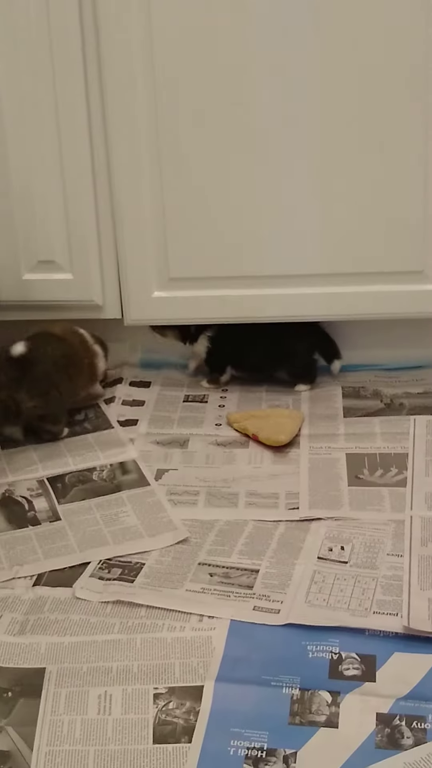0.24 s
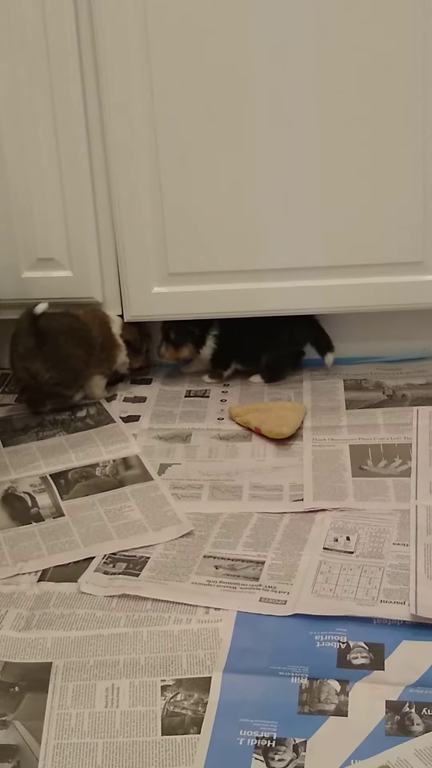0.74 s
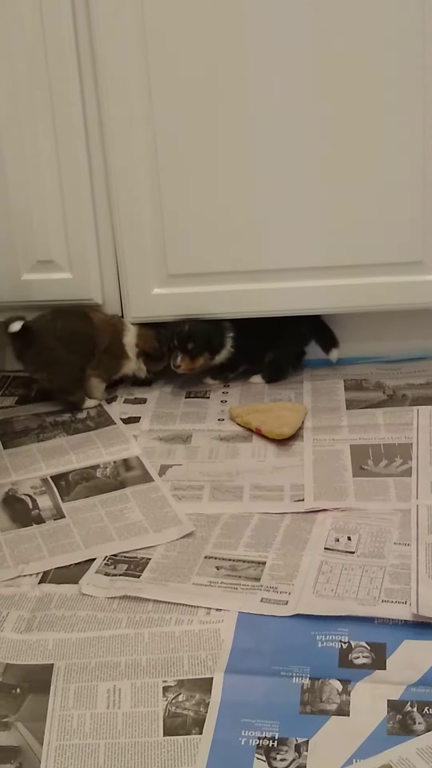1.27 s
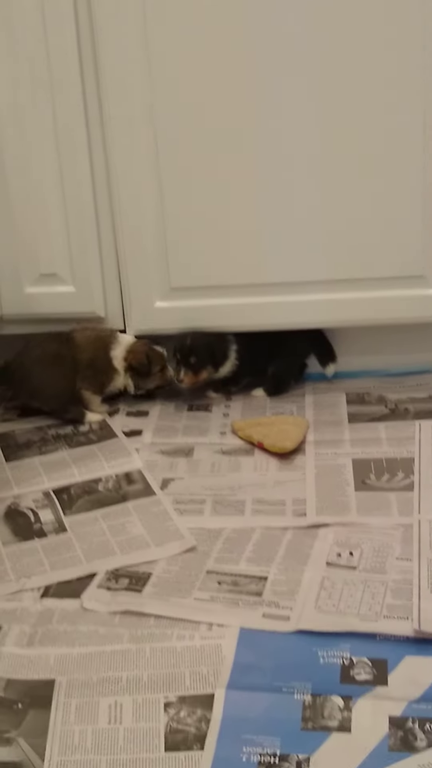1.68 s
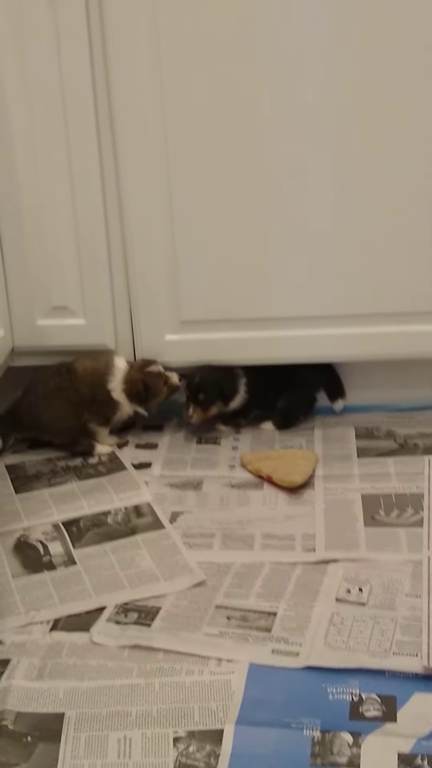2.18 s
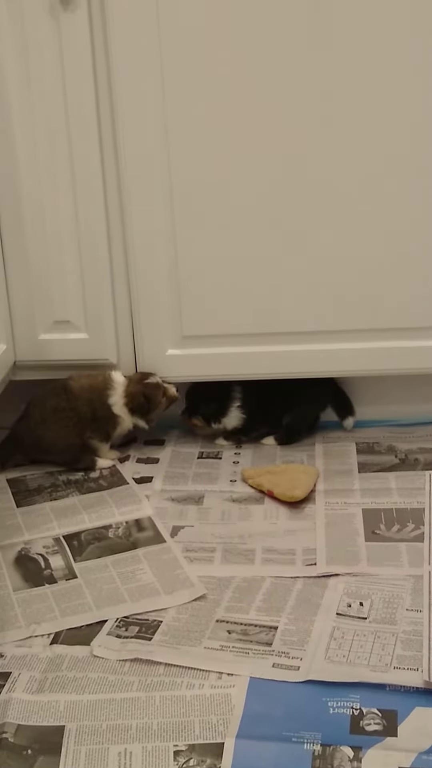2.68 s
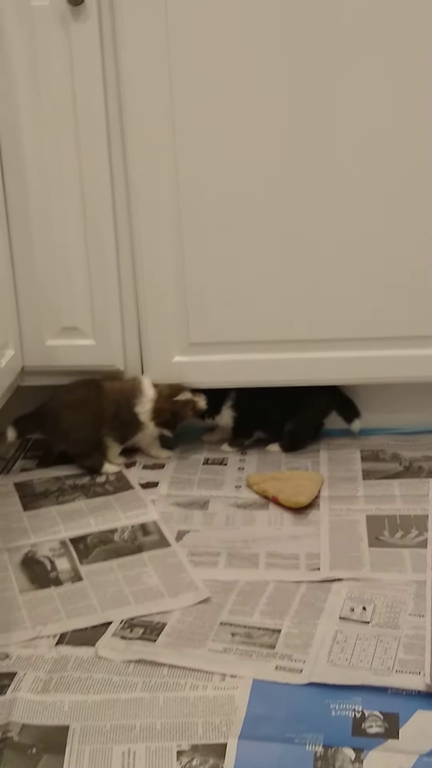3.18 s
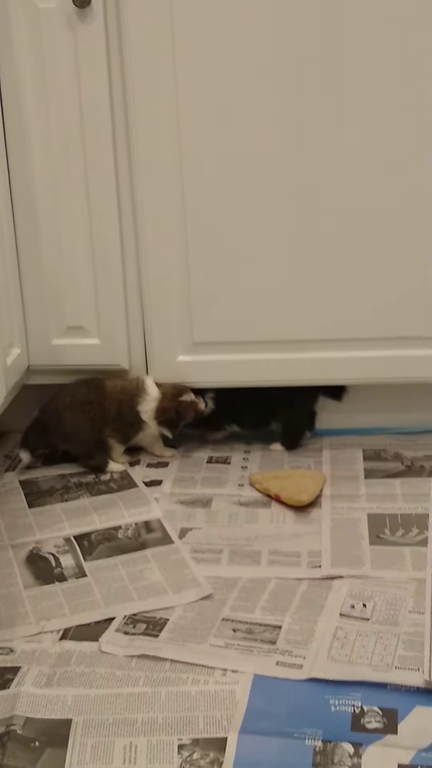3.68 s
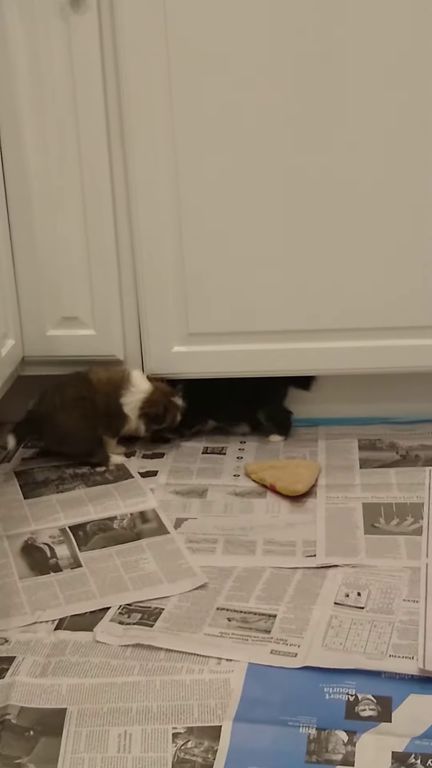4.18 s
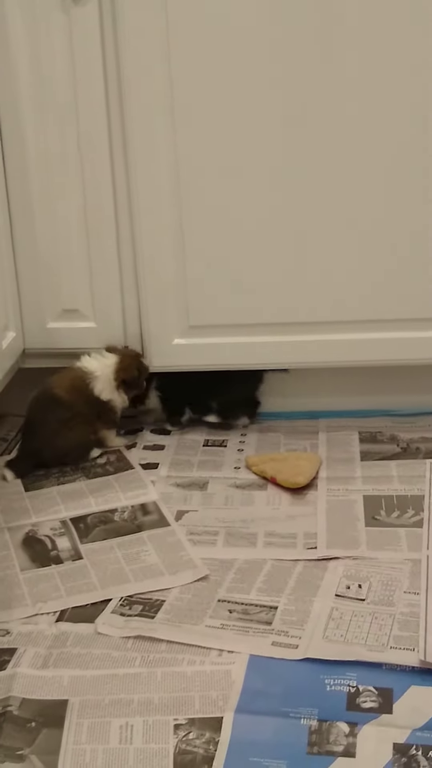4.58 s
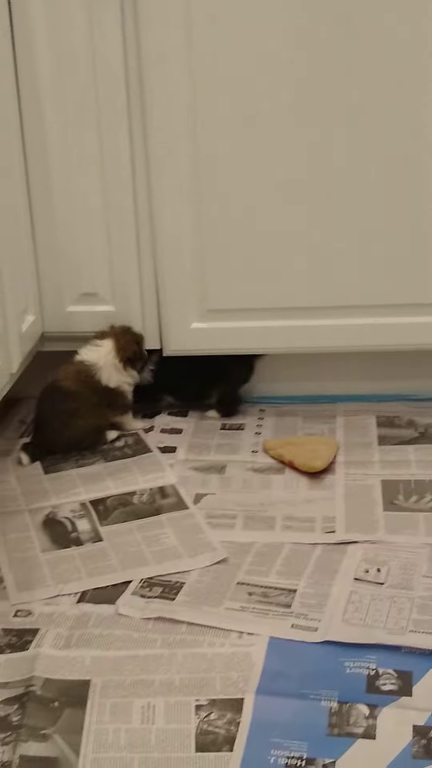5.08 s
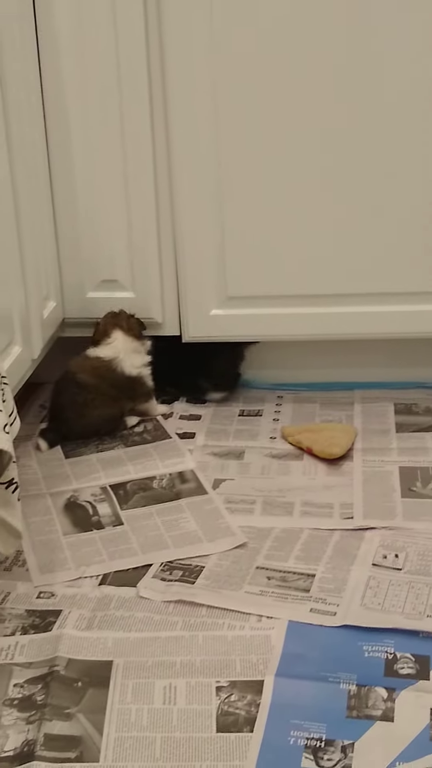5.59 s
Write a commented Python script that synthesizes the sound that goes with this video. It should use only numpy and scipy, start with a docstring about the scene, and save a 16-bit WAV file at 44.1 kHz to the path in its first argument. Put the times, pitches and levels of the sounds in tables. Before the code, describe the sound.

In a quiet kitchen with a faint steady room tone, puppies shuffle on newspaper laid over a hard floor. At about 0.1 s a soft double thud with a hollow cupboard rumble comes with a short crinkle and crease. It then falls almost silent, with only tiny ticks and a faint bump near 0.8 s. From 1.2 s small rustles begin, and between 1.8 and 3 s crisp snaps of buckling paper come often over light sliding hiss. From 3.1 s the movement is stronger: the heaviest thud lands near 3.5 s, with loud crinkles around 3.25, 3.75 and 4.05 s. Sliding swells near 4.3 s, a soft thump falls at 4.5 s, and further shoves follow at 4.8 and 5.2 s. Sharp creases pop near 5.35 and 5.5 s, with a last soft bump at 5.7 s and a crinkle just after. Light paw padding runs underneath; the reverberation is short and the stereo wide.

```python
"""Sheets of newspaper crinkle, slide and snap as small puppies shuffle on them on a hard kitchen floor.
Crinkle, hiss and padding are swarms of coloured noise grains; buckling creases are resonant bursts.
Soft thuds join damped low modes to filtered noise, the rumble and scrape of a cupboard.
Diffuse reverberation answers the paper over a faint room tone; two spaced microphones receive it all."""
import sys
import numpy as np
from scipy import signal
from scipy.fft import rfft, irfft, next_fast_len
from scipy.io import wavfile
from scipy.ndimage import uniform_filter1d

SR = 44100
rng = np.random.default_rng(int(sys.argv[2]) if len(sys.argv) > 2 else 0)


def volts_from_decibels(level):
    """Turn decibel levels (scalar or array-like) into linear amplitude factors."""
    exponent = np.asarray(level, float) / 20
    return 10 ** exponent


def dump(signal):
    """Clip the signal to [-1, 1] and save it as 16-bit WAV at the path in sys.argv[1]."""
    limited = np.clip(np.atleast_2d(signal).T, -1, 1)
    pcm = np.round(limited * 32767).astype(np.int16)
    wavfile.write(sys.argv[1], SR, pcm)


N = 257984  # samples

# Room tone spectrum: (frequency [Hz], relative density [dB per Hz])
TONE_SPECTRUM = [(15, -61), (25, -34), (64, -45), (76, -7.5), (161, -18), (217, -3), (317, -15.5),
                 (489, -19), (531, -20), (1560, -34), (8360, -27.5), (9070, -28), (11900, -27),
                 (12900, -20), (13600, -25), (16000, -25)]
# Reverberation of the kitchen: (frequency [Hz], decay time by 60 dB [s])
KITCHEN_DECAY = [(60, 0.43), (250, 0.19), (1000, 0.23), (4000, 0.23), (12000, 0.18)]

# Soft landings: (time [s], nominal level [dB], low modes [dB], door [dB], rise time of the noise [s])
LANDINGS = [(.087, -40.5, -12, 5.5, .0059), (.101, -34, -8, 4.5, .026), (.747, -58, -20, 10.5, .004),
            (.837, -41.5, -26, 6, .031), (1.152, -53, -17, -10, .011), (1.395, -52, -20, 3, .006),
            (2.077, -56.5, -4.5, -1, .016), (2.74, -57, -12, 2, .03), (3.124, -41.5, -36, 9.5, .0099),
            (3.18, -49, -25, 8, .015), (3.227, -55, -3, -8, .0082), (3.308, -53.5, -4, -1, .014),
            (3.358, -57, -6, 12, .0066), (3.476, -27, -7.5, .5, .013), (4.029, -57, -9, 12, .011),
            (4.17, -54, -20, 3, .03), (4.53, -35, -7, 6, .024), (4.63, -48, -11, 3, .015),
            (4.726, -55, -4, -8, .027), (4.892, -48, -1.5, -6.5, .021), (5.09, -49, -17, -20, .0054),
            (5.72, -34.5, -20, -9, .016)]
# Low modes of floor and room: (frequency [Hz], relative level [dB], decay by 60 dB [s], build-up [s])
FLOOR_MODES = [(53.7, -8, 0.45, 0.058), (93.1, -3, 0.38, 0.011), (120, 1.5, 0.18, 0.0042)]
# Cupboard door modes: (frequency [Hz], width [Hz], relative level [dB])
DOOR_MODES = [(323, 26, -1.5), (398.5, 28, 1.5), (464, 60, -3), (552, 80, -3.5), (647, 35, -0.5),
              (765, 56, -3), (915, 150, -6.5), (1140, 250, -9.5)]
# Cupboard carcass spectrum: (frequency [Hz], relative density [dB per Hz])
CARCASS_SPECTRUM = [(90, -26), (150, -1), (190, 3), (260, 4), (340, -10), (550, -27.5)]
# Scrape of fur and claws: (frequency [Hz], relative density [dB per Hz])
SCRAPE_SPECTRUM = [(500, 8), (1000, 1.5), (2500, -1.5), (6000, -18.5), (11000, -10.5), (16000, -57)]

# Buckling creases: (time [s], nominal level [dB], centre [Hz], relative treble [dB], left-right [dB])
CREASES = [(.0913, -31, 2330, -21, 17), (.289, -48, 4160, -20, 8), (.463, -52, 6900, -19, -5),
           (1.1952, -52, 3760, -18, -4), (1.268, -44, 1860, -4, 2), (1.418, -42, 2750, -5, -4),
           (1.452, -39, 2820, -23, -.5), (1.512, -39, 5400, -17, 6), (1.5359, -46, 2060, 0, -1.5),
           (1.665, -46, 3600, 2, -3.5), (1.707, -43, 4080, -25, -3), (1.8013, -43.5, 2760, -13, 5),
           (1.8137, -36, 5600, -22, -7), (1.875, -40.5, 3900, -3, -5), (1.9804, -31, 6840, -28, -6),
           (2.035, -28.5, 5900, -5, -1.5), (2.0557, -33.5, 3840, -14, 2), (2.0914, -36, 4840, -19, 3),
           (2.168, -28, 4070, -8, -3), (2.377, -39.5, 5200, -19, 0), (2.3965, -43, 5350, -16, 13),
           (2.572, -39, 2160, -15, 2), (2.603, -38.5, 3840, 2, -10), (2.6457, -25.5, 3400, -4, -1.5),
           (2.715, -37, 5060, -4, -2), (2.7263, -28.5, 3850, 3.5, -3.5), (2.77, -40, 4000, -6, -2),
           (2.8043, -35, 3620, 4, -5), (2.822, -36.5, 4770, -12, 8), (2.8614, -37, 1950, -31, 0),
           (2.9264, -42, 3420, 4, -3), (3.028, -44, 4400, 1, -3.5), (3.1203, -36, 2420, -1.5, 2),
           (3.229, -36, 3040, 8, 9), (3.252, -28, 3930, -5, -2.5), (3.3637, -28, 2680, -24, 1),
           (3.4055, -38, 2650, -1, -12), (3.4745, -27, 2430, 2.5, 7), (3.6545, -26, 4100, -3, -5),
           (3.7474, -26.5, 4300, -6, -5.5), (3.8368, -35.5, 4530, -22, -8), (3.903, -35, 4400, -24, -5),
           (3.9789, -35, 3970, -34, -5), (4.022, -40, 3700, -14, -1), (4.0496, -26.5, 3990, 1.5, -14),
           (4.0911, -29.5, 2330, 12, -1), (4.2457, -28, 2500, -5, -5.5), (4.4775, -43, 2350, 5, -4.5),
           (4.53, -42, 2000, -9, 9), (4.7223, -37, 3340, -1, -7), (5.1804, -35, 3100, -18, -1),
           (5.2235, -32, 3100, -20, -6), (5.2865, -35.5, 2800, -22, -4.5), (5.2998, -31.5, 2380, -24, -10),
           (5.3588, -25, 3030, -32, -1), (5.368, -30.5, 3100, -30, 2), (5.5258, -23, 2360, -1.5, -1),
           (5.582, -30.5, 4830, -4.5, -10), (5.685, -46, 4300, -23, -10), (5.7512, -30.5, 2700, -28, 8.5),
           (5.831, -40, 2400, -5, -5)]
# Shoves of a paw on the sheets: (peak time [s], relative crinkle level [dB], relative slide hiss [dB],
# time to swell by 20 dB [s], time to fade by 20 dB [s])
PAW_SHOVES = [(.005, -70, -68, .05, .5), (.105, -40.5, -36, .015, .1), (.23, -64, -58, .1, .06),
              (.37, -80, -63, .012, .12), (.47, -72, -66, .04, .03), (.76, -80, -84, .02, .08),
              (.817, -72, -57, .012, .1), (.87, -53, -64, .06, .08), (1.15, -73, -66, .15, .15),
              (1.32, -55, -50, .12, .07), (1.45, -53, -60, .08, .2), (1.55, -60, -57, .05, .04),
              (1.7, -59, -62, .2, .25), (1.82, -61, -55, .03, .4), (1.99, -50, -46, .06, .2),
              (2.12, -52, -52, .2, .12), (2.265, -60, -57, .2, .02), (2.41, -56, -66, .02, .055),
              (2.56, -58, -54, .012, .3), (2.7, -56, -52, .2, .2), (2.82, -53, -50, .2, .13),
              (3.06, -61, -52, .15, .045), (3.13, -52, -52, .03, .3), (3.25, -43.5, -52, .07, .1),
              (3.36, -48, -44, .02, .2), (3.49, -45, -45, .06, .22), (3.6, -48, -46, .06, .06),
              (3.655, -54, -43, .015, .05), (3.745, -39, -42, .035, .11), (3.91, -58, -57, .02, .2),
              (3.99, -50, -54, .02, .3), (4.06, -42.5, -39, .03, .23), (4.25, -42, -45, .02, .1),
              (4.318, -43, -36.5, .1, .085), (4.49, -64, -60, .15, .012), (4.59, -45, -47, .08, .09),
              (4.68, -50, -47, .012, .15), (4.77, -40.5, -41, .07, .055), (4.93, -50.5, -50, .3, .065),
              (5.095, -53, -50, .1, .1), (5.155, -55, -40, .15, .1), (5.234, -38.5, -53, .1, .12),
              (5.36, -44.5, -44, .012, .3), (5.43, -42.5, -44, .15, .055), (5.53, -47, -43, .012, .1),
              (5.69, -58, -51, .015, .07), (5.784, -45.5, -65, .03, .05)]
# Light padding of paws: (time [s], relative level [dB])
PADDING_LEVEL = [(0, -64), (.49, -73), (1.0, -72), (1.3, -68), (2.13, -69), (2.45, -74), (2.72, -65),
                 (3.05, -72), (3.34, -58), (3.84, -64), (4.24, -60), (4.4, -69), (4.56, -69), (4.76, -61),
                 (5.0, -68), (5.2, -63), (5.31, -61), (5.85, -64)]
# Spectra of padding, sliding and crinkling: (frequency [Hz], relative density [dB per Hz])
PADDING_SPECTRUM = [(60, -11), (100, 0), (240, -0.5), (500, -2), (1000, -4.5), (2000, -16.5)]
SLIDE_SPECTRUM = [(1760, -36), (3000, -17.5), (3290, -9), (3480, -19), (4260, -15), (4700, -6.5),
                  (9870, -4), (16000, -2)]
CRINKLE_SPECTRUM = [(410, -48), (700, 3.5), (852, -5.5), (1050, 4), (1420, 2), (3740, 6.5), (7200, -4.5),
                    (10900, 6), (16000, -20)]

# Response shared by both microphones: (frequency [Hz], gain [dB])
MIC_RESPONSE = [(32, -21), (50, 1.5), (11000, -0.5), (13000, -3), (16000, -9.5)]
# Mismatch of the microphones: (frequency [Hz], left-right [dB])
MIC_MISMATCH = [(60, 1.8), (250, 1.5), (1000, 1), (3000, -0.4), (6000, 0.3), (8500, 0.5), (10500, -8.5),
                (12500, -5), (16000, 0.5)]

TONE_DB = -67.5  # rms at the microphones, ahead of their response
SPACING_M, SOUND_SPEED = 0.18, 343  # between the microphones; m/s
PAPER_LAG_S = 0.000411  # the paper reaches the left microphone this much after the right
TOP_HZ = 15900  # band limit
THUD_T60_S, SCRAPE_DB = .37, -5  # the scrape goes with the door
DEEP_PER_DB = .3  # harder landings reach deeper: dB gained per dB of thud and per octave down
SNAP_S = .0042  # time scale of the chatter
SNAP_ROOM_DB, ROOM_DB_PER_OCTAVE = -2.5, -3.5  # share sent to the room at 3 kHz; small creases beam more
NARROWS_PER_DB = .035  # creases with under -12 dB of treble ring more narrowly: width share per dB
SHOVE_ROUND = 1.2  # 1 = pointed peak, more = a held push that stops abruptly
PRESS_DB = -19  # a shove presses on the floor too
SIDES = np.array([[1], [-1]])  # left, right


def unit(x):
    """Normalisation to a root mean square of one."""
    return x / np.sqrt(np.mean(x ** 2) + 1e-20)


def along(points, hz):
    """Linear interpolation of (Hz, value) points on a logarithmic frequency axis."""
    f, v = np.transpose(points)
    return np.interp(np.log(hz + 1), np.log(f + 1), v)


def curves(rows):
    """Linear interpolation in time: one value per sample for each column after the time."""
    s, *cols = np.transpose(rows)
    return [np.interp(np.arange(N) / SR, s, c) for c in cols]


def filtered(x, response):
    """Linear filtering: the spectrum of x times a complex response of frequency."""
    m = next_fast_len(x.shape[-1] + 8192)
    spectrum = rfft(x, m) * response(np.fft.rfftfreq(m, 1 / SR))
    return irfft(spectrum, m)[..., :x.shape[-1]]


def coloured(x, spectrum):
    """Spectral shaping to a given density, at unit rms."""
    return unit(filtered(x, lambda hz: volts_from_decibels(along(spectrum, hz))))


def resonant(x, modes):
    """Modal superposition: damped resonances (Hz, width, dB) summed with alternating sign."""
    def response(f):
        total = 0
        for k, (centre, width, db) in enumerate(modes):
            damping = 1j * f * width
            total = total + (-1) ** k * volts_from_decibels(db) * damping / (centre * centre - f * f + damping)
        return total
    return filtered(x, response)


def diffuse(pair):
    """Diffuse-field coherence: alike in the bass, unrelated once the wave is shorter than the spacing."""
    def mid_side_gains(hz):
        turn = np.arccos(np.sinc(2 * hz * SPACING_M / SOUND_SPEED)) / 2
        return np.array([np.cos(turn), np.sin(turn)])
    mid, side = filtered(pair, mid_side_gains)
    return np.array([mid + side, mid - side])


def grains(per_s, spread_db, life):
    """Shot noise: tiny decaying bursts of uneven size at chance moments, evened over 0.1 s."""
    kicks = (rng.random(N) < per_s / SR) * volts_from_decibels(spread_db * rng.standard_normal(N))
    decay = np.exp(-np.arange(SR // 20) / (life * SR))
    swarm = signal.fftconvolve(kicks, decay)[:N] * rng.standard_normal(N)
    return swarm / np.sqrt(abs(uniform_filter1d(swarm ** 2, size=SR // 10)) + 1e-6)


def room_tone():
    """Stationary diffuse noise: random sound from all sides with a fixed spectrum."""
    return volts_from_decibels(TONE_DB) * coloured(diffuse(rng.standard_normal((2, N))), TONE_SPECTRUM)


def kitchen(x):
    """Reverberation as decaying noise; the sources move, so the tail changes from moment to moment."""
    hop, out = 2048, np.zeros((2, N + 2 * SR))
    x = np.pad(x, (hop, 2 * hop))
    for start in range(0, N + hop, hop):
        hz, t, z = signal.stft(rng.standard_normal((2, SR // 2)), SR, nperseg=256)
        decay = volts_from_decibels(-60 * t / along(KITCHEN_DECAY, hz)[:, None])
        tail = signal.istft(z * decay, SR, nperseg=256)[1]
        tail = unit(tail) / np.sqrt(tail.shape[1])
        piece = x[start:start + 2 * hop] * signal.windows.hann(2 * hop, sym=False)
        wet = signal.fftconvolve(piece[None], tail, axes=1)
        out[:, start:start + wet.shape[1]] += wet
    first_wall = round(.003 * SR)  # the tail starts 3 ms late
    return diffuse(out[:, hop - first_wall:][:, :N])


def low_modes(t, db, low_db):
    """Damped modal vibration: the floor and room modes that one landing sets ringing."""
    boom = np.zeros(len(t))
    for hz, mode_db, t60, build in FLOOR_MODES:
        deep_db = DEEP_PER_DB * (db + 40) * np.log2(FLOOR_MODES[-1][0] / hz)
        drift = 4 * np.cumsum(rng.standard_normal(len(t))) / np.sqrt(SR)  # the weight keeps shifting
        cycle = np.sin(2 * np.pi * hz * t + drift)
        decay = volts_from_decibels(db + low_db + mode_db + deep_db + 5 - 60 * t / t60)
        boom += decay * (1 - np.exp(-t / build)) * cycle
    return boom


def evened(x):
    """Levelling of power over 40 ms, as from a firm contact."""
    power = uniform_filter1d(np.mean(x ** 2, axis=0), size=SR // 25)
    return x / np.sqrt(abs(power) + 1e-9)


def thuds():
    """Impact of a soft body: low modes ring, diffuse cupboard rumble and scrape build up and die away."""
    t = np.arange(SR // 2) / SR
    boom, swells = np.zeros(N + SR), np.zeros((3, N + SR))
    for s, db, low_db, door_db, rise in LANDINGS:
        at = slice(round(s * SR), round(s * SR) + len(t))
        # carcass, door, scrape: the higher, the sooner gone
        shares = volts_from_decibels([-4 + 0 * t, door_db - 5.5 - 12 * t, door_db + SCRAPE_DB - 25 * t])
        swells[:, at] += shares * (1 - np.exp(-t / rise)) * volts_from_decibels(db - 60 * t / THUD_T60_S)
        boom[at] += low_modes(t, db, low_db)
    a, b, c = (diffuse(rng.standard_normal((2, N))) for _ in range(3))
    carcass = evened(coloured(a, CARCASS_SPECTRUM))
    door = evened(resonant(b, DOOR_MODES))
    scrape = coloured(c, SCRAPE_SPECTRUM)
    noises = carcass, door, scrape
    return boom[:N] + sum(swell[:N] * noise for swell, noise in zip(swells, noises))


def snaps():
    """Buckling excites a resonance set by crease size: chatter at both microphones, clicks for the room."""
    near, clicks, t = np.zeros((2, N + SR)), np.zeros(N + SR), np.arange(2048) / SR
    u = t / SNAP_S
    envelope = u ** 0.89 * np.exp(-2.2 * u ** 2.9)
    for s, db, hz, treble_db, pan_db in CREASES:
        room_db = SNAP_ROOM_DB + ROOM_DB_PER_OCTAVE * np.log2(hz / 3000)
        width = np.clip(0.92 + NARROWS_PER_DB * (treble_db + 12), .4, .92) * hz
        modes = [(hz, width, 0), (10500, 4500, treble_db)]
        shared, *own = rng.standard_normal((3, len(t))) * envelope
        burst = resonant(shared + 1.57 * np.array(own), modes)
        burst = burst / np.linalg.norm(burst, axis=1, keepdims=True)
        click = resonant(1. * (t == 0), modes)
        click = click / np.linalg.norm(click)
        size = volts_from_decibels(db - 9) * np.sqrt(SNAP_S * SR)  # from level and length to the norm of the burst
        at = slice(round(s * SR), round(s * SR) + len(t))
        near[:, at] += size * volts_from_decibels(pan_db / 2 * SIDES) * burst
        clicks[at] += size * volts_from_decibels(room_db) * click
    return near[:, :N], clicks[:N]


def shoves():
    """Addition of powers: gains of crinkle and hiss as every shove swells to its peak and fades."""
    t = np.arange(0, N, 32)[:, None] / SR
    s, crinkle_db, slide_db, swell, fade = np.transpose(PAW_SHOVES)
    under_db = 20 * np.where(t < s, (s - t) / swell, (t - s) / fade) ** SHOVE_ROUND
    gains = []
    for db in (crinkle_db, slide_db):
        total = np.sqrt(np.sum(volts_from_decibels(2 * (db - under_db)), axis=1))
        gains.append(np.interp(np.arange(N) / SR, t[:, 0], total))
    return gains


def padding(crinkle_gain):
    """Repeated soft contact: paws pad lightly and press harder on the floor with each shove."""
    (level_db,) = curves(PADDING_LEVEL)
    patter = coloured(grains(per_s=250, spread_db=3.5, life=.006), PADDING_SPECTRUM)
    return (volts_from_decibels(level_db) + volts_from_decibels(PRESS_DB) * crinkle_gain) * patter


def sliding(gain):
    """Friction: a dense swarm of grains gives the smoother hiss of sheet over sheet."""
    return gain * coloured(grains(per_s=2000, spread_db=7.5, life=.001), SLIDE_SPECTRUM)


def crinkling(gain):
    """Crackling noise: many small creases give way in a sparser swarm."""
    return volts_from_decibels(-4) * gain * coloured(grains(per_s=700, spread_db=6.5, life=.001), CRINKLE_SPECTRUM)


def paper():
    """Superposition of the crinkle, slide and padding that the same shoves drive."""
    crinkle_gain, slide_gain = shoves()
    return crinkling(crinkle_gain) + sliding(slide_gain) + padding(crinkle_gain)


def scene():
    """Direct and reverberant fields: the paper arrives with a lag between the microphones, then the room."""
    rustle, (chatter, clicks) = paper(), snaps()
    lag = lambda hz: np.exp(-1j * np.pi * hz * PAPER_LAG_S * SIDES)
    direct = filtered(volts_from_decibels(-4.0) * rustle + chatter, lag)
    wet = kitchen(volts_from_decibels(3.0) * rustle + volts_from_decibels(5.0) * clicks)
    return direct + wet + thuds() + room_tone()


def band_limit(x):
    """A steep low-pass at the top of the band."""
    return signal.sosfilt(signal.butter(12, 16660, fs=SR, output="sos"), x)


def record(dry):
    """Transducer response: two microphones of unequal response, with a sharp band limit."""
    gain = lambda hz: volts_from_decibels(along(MIC_RESPONSE, hz) + along(MIC_MISMATCH, hz) / 2 * SIDES)
    mix = filtered(dry, lambda hz: (hz < TOP_HZ) * gain(hz))
    return band_limit(mix)


dry = scene()
out = record(dry)
dump(out)
```